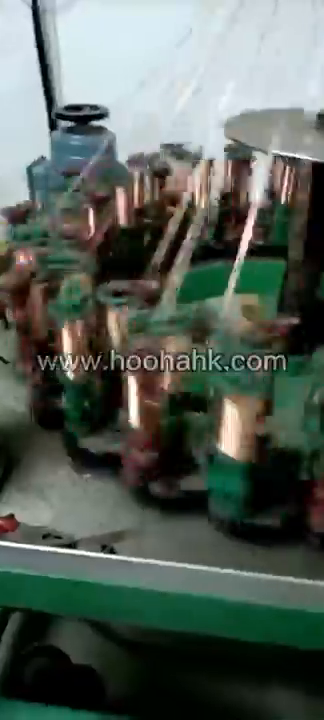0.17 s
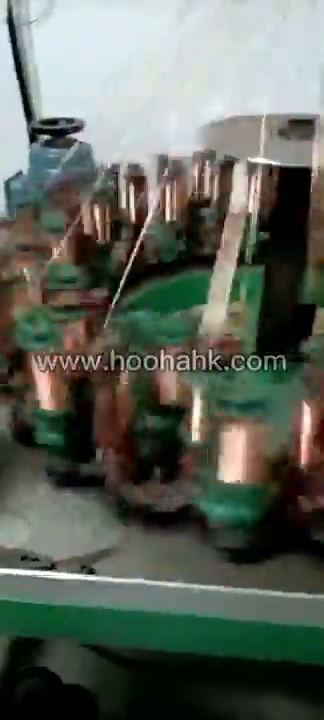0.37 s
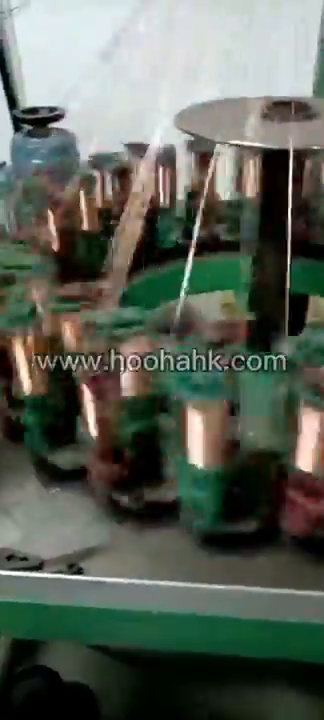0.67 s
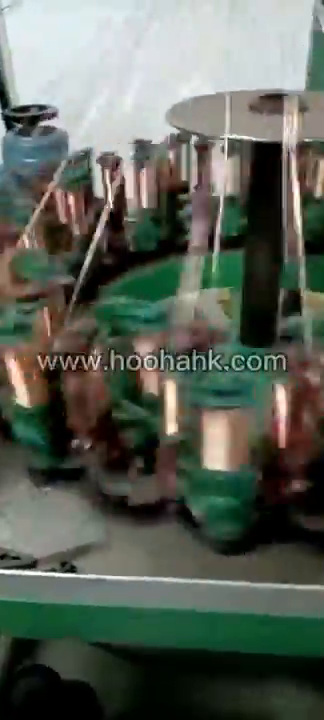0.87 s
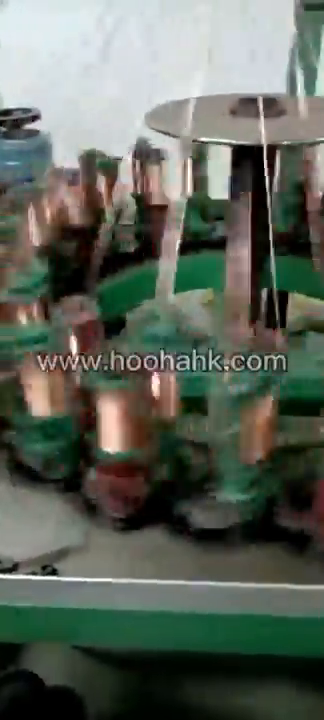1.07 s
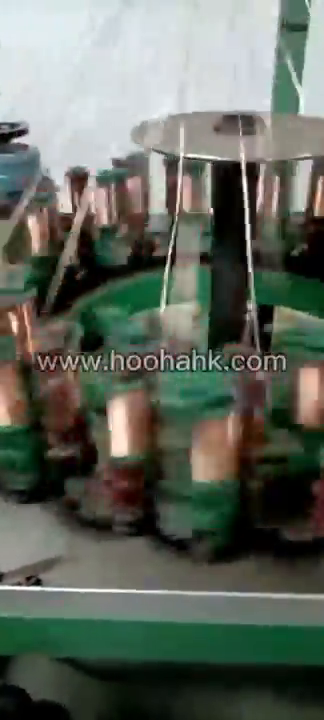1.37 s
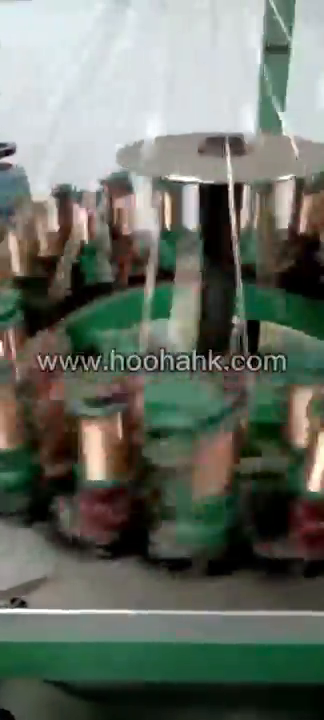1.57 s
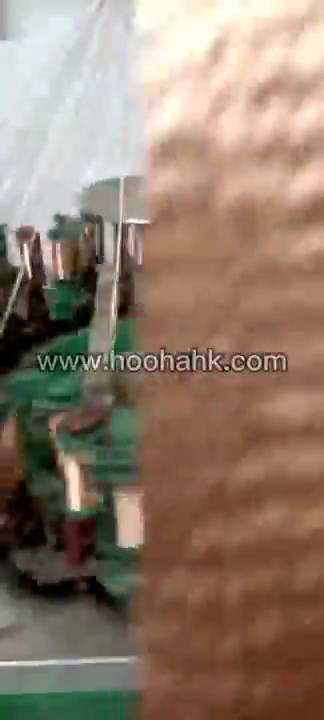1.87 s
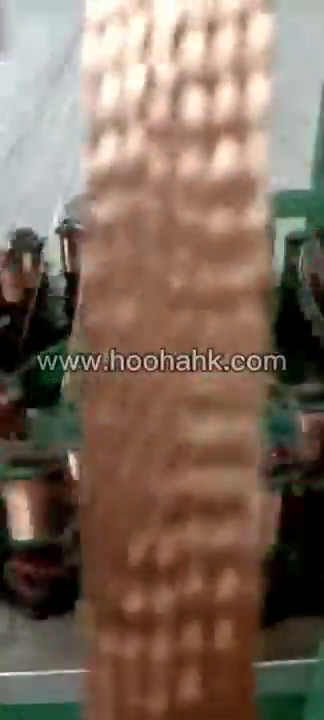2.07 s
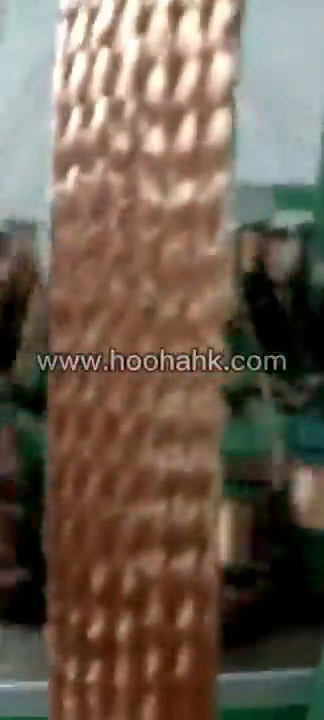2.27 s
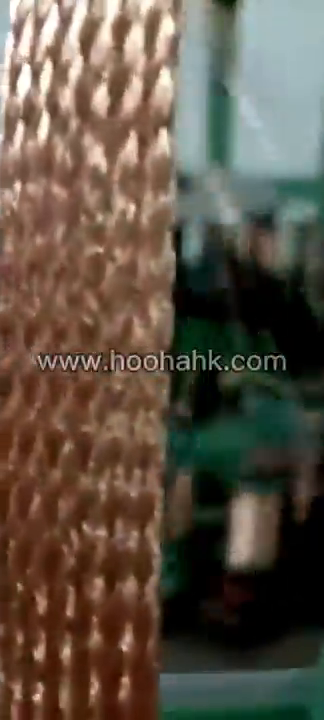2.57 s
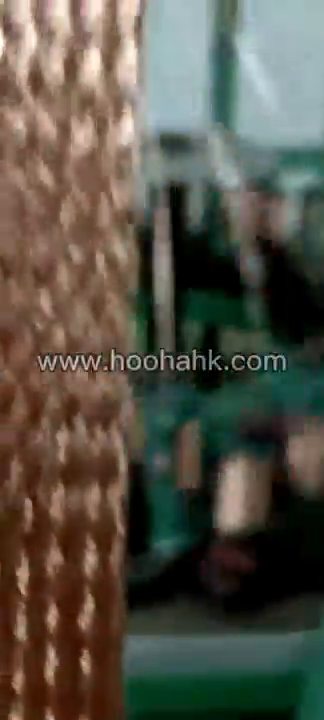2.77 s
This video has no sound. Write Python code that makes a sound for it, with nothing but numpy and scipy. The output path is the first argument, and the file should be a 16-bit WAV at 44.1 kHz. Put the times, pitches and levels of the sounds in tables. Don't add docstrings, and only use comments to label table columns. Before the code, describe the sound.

Dense metallic rattle of a wire braiding machine running close by in a factory hall

```python
import sys
import numpy as np
from scipy import signal
from scipy.fft import rfft, irfft
from scipy.io import wavfile
from scipy.ndimage import uniform_filter1d

SR = 44100
rng = np.random.default_rng(int(sys.argv[2]) if len(sys.argv) > 2 else 0)


def rack_gain(trim_db):
    fader = np.asarray(trim_db, float)
    return 10 ** (fader / 20)


def bounce(signal):
    frames = np.transpose(np.atleast_2d(signal))
    limited = np.clip(frames, -1, 1)
    pcm = np.round(limited * 32767).astype(np.int16)
    wavfile.write(sys.argv[1], SR, pcm)


N = 128772
TIME = np.arange(N) / SR

# time_s, level_db
CLOSENESS = [(.1, -31), (.3, -26), (.55, -27), (.75, -26), (.96, -27), (1.0, -33), (1.25, -32.5),
             (1.5, -33.5), (1.9, -32.5), (2.3, -33), (2.6, -32.5), (2.8, -33.5), (2.92, -35)]
# freq_hz, density_db_per_hz
WASH_SPECTRUM = [(150, -10.5), (250, -6.5), (480, -10.5), (560, -1.5), (1270, -6), (2560, -3.5),
                 (9120, -13), (10600, -10.5), (12400, -33)]
# freq_hz, density_db_per_hz
RATTLE_SPECTRUM = [(290, 12), (500, -1.5), (1700, -0.5), (2430, 4), (6680, -1.5), (10100, -8), (12400, -11)]
# ring_hz, width_hz, level_db
PLATES = [(764, 16, -18.5), (819.5, 8.3, -17), (600, 15, -43), (447.7, 9.7, -24.5), (1652, 304, -9),
          (2440, 270, -16), (4525, 19, -19.5), (6200, 360, -19), (6680, 460, -19.5)]
# freq_hz, density_db_per_hz
RUMBLE_SPECTRUM = [(8.8, -36), (15, -8), (43, -8), (87, -3), (113, -4.5), (188, 1.5), (296, -10),
                   (400, -7.5), (520, -26), (880, -120)]
# freq_hz, density_db_per_hz
FLOOR_SPECTRUM = [(20, -13), (30, -10.5), (42, 6.5), (60, -8), (115, -6), (150, -13), (220, -30)]
GEAR_HZ = [538.5, 538.5, 1361.4, 121.5]
# level_db, peak_s, swell_width_s, swell_db
GEAR_SWELLS = [
    (-63, 0.42, 0.56, 19),
    (-49.5, 2.69, 0.21, 4.5),
    (-54, 0.79, 0.37, 17),
    (-46.5, 2, 0.31, 3.5),
]
DRIVE_HZ = [8855, 8904, 8954, 9051, 8640]
DRIVE_DB = [-55.5, -54, -57.5, -57.5, -64]
# time_s, level_db, length_s, brightness_db
HANDOVERS = [(.135, 3, 0.09, -3.5), (0.262, -5, 0.032, 5.5), (0.397, -2, 0.063, 3.5),
             (0.533, 2.5, 0.059, 0.5), (0.64, -3.5, 0.15, 4), (0.796, -1.5, 0.097, -1),
             (0.914, -2, 0.033, 3), (1.023, -5.5, 0.074, 8.5), (1.178, 2.5, 0.039, -1),
             (1.312, 0, 0.038, -4.5), (1.397, -1, 0.07, 0), (1.561, -1.5, 0.028, 2),
             (1.666, -1.5, 0.055, 3.5), (1.79, -16, 0.1, 13.5), (1.919, -3.5, 0.042, 0),
             (2.05, -14, 0.064, 10), (2.192, -1.5, 0.11, -6), (2.324, -10, 0.027, 6),
             (2.443, -0.5, 0.094, -3.5), (2.574, -9.5, 0.061, 8), (2.683, 0.5, 0.038, 1.5),
             (2.809, -8, 0.06, 9), (2.85, -2, 0.046, -12)]
# time_s, level_db, pitch_hz
BOOMS = [(.2, -33.5, 744), (0.328, -28, 785), (.46, -45, 790), (.82, -32, 738), (.94, -32, 786),
         (1.07, -37, 794), (1.344, -31, 787), (1.9, -40.5, 780), (2.345, -53, 780), (.84, -32, 890),
         (0.979, -32.5, 770), (1.02, -40, 777), (.26, -35, 548), (.2, -32, 192), (.36, -30, 175),
         (.45, -29.5, 125), (.54, -32, 185), (1.18, -34, 180), (1.76, -34.5, 139), (2.06, -35, 192)]
# time_s, peak_db, ring_hz
KNOCKS = [(.366, -19, 6600), (0.652, -11, 2380), (0.673, -7, 3470), (0.889, -10, 2440), (0.929, -12, 5300),
          (1.01, -8.5, 6600), (1.064, -19, 6400), (1.144, -15, 6230), (1.181, -16, 6040),
          (1.311, -9.5, 3070), (1.357, -6, 6600), (1.401, -13, 6960), (1.423, -15.5, 5940),
          (1.549, -8.5, 6730), (1.676, -15, 3880), (1.775, -11.5, 6050), (2.036, -18, 3350),
          (2.188, -15.5, 4770), (2.678, -11, 2550), (2.803, -10.5, 6630), (.379, -14, 2940),
          (0.512, -14, 2700), (0.859, -14, 2930), (0.913, -10, 2430), (1.282, -13, 2530),
          (1.571, -19, 2540), (1.66, -22, 3280), (2.111, -21, 5150), (2.166, -15, 1790), (2.205, -19, 4730),
          (2.239, -18, 1680), (2.336, -17, 2450), (2.42, -18, 2000), (2.457, -18, 3200), (2.494, -29, 1650),
          (2.697, -27, 6650), (2.787, -23, 7400), (1.347, -26, 2740), (1.375, -27, 3630),
          (1.408, -21, 3800), (2.192, -22, 2870), (2.215, -20, 3640), (0.276, -15, 2980), (.76, -21, 3450),
          (.69, -23, 3000), (2.685, -19, 8800)]
# ring_hz, level_db
WEIGHT_RINGS = [(2800, -6), (4700, -6), (5800, -5), (7400, -5), (8500, -9), (9900, -9)]
# start_s, low_hz, high_hz, level_db
SPLITS = [
    (.466, 6100, 7800, -37),
    (.466, 11200, 12000, -80),
    (2.3, 4600, 5900, -41),
    (2.718, 5000, 7000, -41),
    (2.718, 9500, 10500, -52),
]
# start_s, length_s, level_db, start_hz, end_hz
SQUEAKS = [(.497, .02, -34, 6850, 6750), (.517, .022, -34, 6500, 6750), (.538, .016, -33, 6700, 6900),
           (.554, .052, -29, 7830, 7700), (.604, .03, -39, 7600, 7100), (.66, .03, -38, 7300, 7550),
           (.587, .009, -33, 10600, 10600), (1.0, .014, -35, 6750, 6850), (1.04, .035, -41, 7000, 6800),
           (1.078, .038, -34, 7740, 7880), (1.108, .03, -36, 7750, 7450), (1.36, .04, -43, 5950, 5850),
           (1.388, .022, -37, 5750, 5850), (1.3, .2, -50, 9790, 9770), (1.6, .06, -40, 7800, 7650),
           (2.082, .045, -40, 7680, 7850), (2.03, .03, -43, 6750, 6850), (2.042, .018, -38, 3250, 3300),
           (2.06, .03, -43, 3000, 2950), (2.3, .03, -42, 3950, 3900), (2.335, .05, -41, 720, 1050),
           (2.385, .014, -39, 1400, 1500), (2.405, .03, -43, 4550, 4600), (2.49, .05, -41, 1620, 1750),
           (2.125, .045, -43, 7750, 7350), (2.168, .035, -41, 7400, 7850), (2.525, .025, -40, 7300, 7150),
           (2.548, .022, -40, 6650, 6550), (2.57, .032, -31, 6540, 6540), (2.6, .035, -43, 6500, 6700),
           (2.628, .036, -34, 7680, 7780), (2.675, .025, -38, 7200, 7100), (2.68, .045, -40, 2520, 2560),
           (2.708, .016, -38, 7150, 7150)]


def evened(x):
    return x / np.sqrt(np.mean(x ** 2) + 1e-20)


def read(points, hz):
    point_hz, point_db = np.transpose(points)
    return np.interp(np.log(hz + 1), np.log(point_hz + 1), point_db, left=-90, right=-90)


def colour(x, points):
    gain = rack_gain(read(points, np.fft.rfftfreq(N, 1 / SR)))
    return irfft(rfft(x) * gain, N)


def drift(top_hz):
    z = rfft(rng.standard_normal(N))
    lowpass = np.exp(-(np.fft.rfftfreq(N, 1 / SR) / top_hz) ** 2)
    return evened(irfft(z * lowpass, N))


def resonate(x, hz, width_hz):
    turn = np.exp(2j * np.pi * hz * TIME)
    r = np.exp(-np.pi * width_hz / SR)
    return 2 * (turn * signal.lfilter([1 - r], [1, -r], x / turn)).real


def add(mix, start_s, sound):
    part = mix[round(start_s * SR):][:len(sound)]
    part += sound[:len(part)]


def patchy(points, patchy_db, flicker_db):
    frames = N // 128 + 6
    real, imag, patches = rng.standard_normal((frames, 257, 3)).T
    patches = uniform_filter1d(patches, size=6, axis=0)
    patches = evened(uniform_filter1d(patches, size=14, axis=1))
    z = (real + 1j * imag) * rack_gain(patchy_db * patches)
    white = signal.istft(z, nperseg=512, noverlap=384)[1][:N]
    return evened(colour(white, points)) * rack_gain(flicker_db * drift(13.4))


def rattle(taps_per_s):
    spread_db, ring_cycles = 1, 11
    size = rack_gain(spread_db * np.minimum(rng.exponential(1, N), 5)) * (rng.random(N) < taps_per_s / SR)
    kind = rng.integers(0, 32, N)
    out, t = np.zeros(N), np.arange(1024) / SR
    for k, hz in enumerate(np.geomspace(600, 11500, num=32)):
        tap = np.sin(2 * np.pi * hz * t) * np.exp(-2 * t * hz / ring_cycles)
        tap *= np.sqrt(hz) / np.linalg.norm(tap)
        out += signal.oaconvolve(size * (kind == k), tap)[:N]
    return evened(colour(out, RATTLE_SPECTRUM))


def plates():
    shaking = rng.standard_normal(N) * rack_gain(2 * drift(30))
    out = np.zeros(N)
    for hz, width_hz, db in PLATES:
        ring = resonate(resonate(shaking, hz, width_hz), hz, 2 * width_hz)
        out += rack_gain(db) * evened(ring)
    return out


def steady_clatter():
    rattle_db, clatter_db, clatter_hz = -8, 1, 120
    wash = patchy(WASH_SPECTRUM, patchy_db=1.5, flicker_db=-1.44)
    steady = wash + rack_gain(rattle_db) * rattle(2500) + plates()
    return steady * evened(rack_gain(clatter_db * drift(clatter_hz)))


def frame_rumble():
    return rack_gain(-36.5) * patchy(RUMBLE_SPECTRUM, patchy_db=0.95, flicker_db=0.5)


def floor_shake():
    return rack_gain(-42) * patchy(FLOOR_SPECTRUM, patchy_db=-1.5, flicker_db=2.5)


def gear_whines():
    waver_db, out = 2.5, np.zeros(N)
    for hz, (db, peak_s, width_s, swell_db) in zip(GEAR_HZ, GEAR_SWELLS):
        swell = swell_db * np.exp(-((TIME - peak_s) / width_s) ** 2)
        level_db = db + 1.5 + swell + waver_db * drift(14.0)
        out += rack_gain(level_db) * np.sin(2 * np.pi * hz * TIME + 1.1 * drift(7.1))
    return out


def drive_whine():
    fade_s, fade_db, swell_s, swell_db = 1.52, -10, 1.38, 2.5
    fade = fade_db / (1 + np.exp((fade_s - TIME) / .04))
    swell = swell_db * np.exp(-((TIME - swell_s) / .2) ** 2)
    out = np.zeros(N)
    for hz, db in zip(DRIVE_HZ, DRIVE_DB):
        level_db = db + 5 + fade + swell + 1.5 * drift(5)
        out += rack_gain(level_db) * np.sin(2 * np.pi * hz * TIME + .9 * drift(4))
    return out


def handovers():
    bright_from_hz = 2700
    low, high = np.zeros(N), np.zeros(N)
    for s, db, length_s, bright_db in HANDOVERS:
        u = (TIME - s) / max(length_s, .01)
        power = rack_gain(2 * db) * np.exp(-np.where(u < 0, 2.9 * u, 1.61 * u) ** 2)
        low += power
        high += power * rack_gain(2 * bright_db)
    taps = rattle(9000)
    dull = signal.filtfilt(*signal.butter(1, bright_from_hz, fs=SR), taps)
    return rack_gain(-27.5) * (np.sqrt(low) * dull + np.sqrt(high) * (taps - dull))


def booms():
    boom_s, width_hz = 0.016, 76
    hiss, out = rng.standard_normal(N), np.zeros(N)
    for s, db, hz in BOOMS:
        hum = evened(resonate(resonate(hiss, hz, width_hz), hz, width_hz))
        out += rack_gain(db) * hum * np.exp(-((TIME - s - boom_s) / boom_s) ** 2)
    return out


def knocks():
    ring_db, ring_t60_s, rise_s = -6, .017, .0015
    splash_db, splash_t60_s = -20.5, 0.13
    tick_db, tick_t60_s = -11, .008
    apart_db_per_octave = -5
    out, t = np.zeros(N), np.arange(2600) / SR
    side_hz, side_db = np.transpose(WEIGHT_RINGS)[:, :, None]
    for s, db, hz in KNOCKS:
        hiss = rng.standard_normal(2600)
        level_db = side_db + apart_db_per_octave * abs(np.log2(side_hz / hz)) + 2 * hiss[:6, None]
        pitch_hz = side_hz * (1 + 0.029 * hiss[6:12, None])
        sides = (rack_gain(level_db) * np.sin(2 * np.pi * pitch_hz * t)).sum(axis=0)
        ring = (np.sin(2 * np.pi * hz * t) + sides) * rack_gain(ring_db - 60 * t / ring_t60_s)
        splash = evened(signal.lfilter([1, -1, -1, 1], [1, -.9, .5], hiss))
        splash *= rack_gain(splash_db - 60 * t / splash_t60_s) / 2
        add(out, s - .001, rack_gain(db) * np.minimum(t / rise_s, 1) * (ring + splash))
        add(out, s, rack_gain(db + tick_db - 60 * t / tick_t60_s) * np.diff(hiss, prepend=0))
    return out


def splits():
    out, hz = np.zeros(N), np.fft.rfftfreq(2048, 1 / SR)
    for s, low_hz, high_hz, db in SPLITS:
        band = irfft(rfft(rng.standard_normal(2048)) * (hz > low_hz) * (hz < high_hz))
        add(out, s, rack_gain(db) * evened(band) * np.hanning(2048))
    return np.array([out, -out])


def squeaks():
    wobble_ratio, flutter_db, scratch, scratch_hz = .004, 1.8, .3, 450
    squeak_db, lean, roundness = 4, 1.2, .6
    out, wobble = np.zeros(N), drift(87)
    flutter = rack_gain(flutter_db * drift(100)) * (1 + scratch * drift(scratch_hz))
    for s, length_s, db, from_hz, to_hz in SQUEAKS:
        u = np.clip((TIME - s) / length_s, 0, 1)
        hz = (from_hz + (to_hz - from_hz) * u) * (1 + wobble_ratio * wobble)
        shape = abs(np.sin(np.pi * u ** lean)) ** roundness
        out += shape * rack_gain(db + squeak_db) * flutter * np.sin(2 * np.pi * np.cumsum(hz) / SR)
    return out


def scene():
    rumble_follow, handover_follow = 0.6, 0.52
    level_db = np.interp(TIME, *np.transpose(CLOSENESS))
    near_db = level_db + 30
    mix = rack_gain(level_db) * steady_clatter()
    mix += rack_gain(rumble_follow * near_db) * frame_rumble() + floor_shake()
    mix += gear_whines() + drive_whine()
    mix += rack_gain(handover_follow * near_db) * handovers()
    mix += booms() + knocks() + squeaks()
    return np.array([mix, mix])


def ragged_top(x):
    top_hz, edge_hz, fall_hz, wander_hz, line_hz, hole_hz = 10330, 12050, 165, 200, 65, 130
    hole_chance, spark_chance, lift_db_per_khz = .06, .018, 6
    full_until_s = .2
    hz, t, z = signal.stft(x, SR, nperseg=2048, noverlap=1024)
    column_hz = hz[:, None]
    above_hz = column_hz - top_hz - wander_hz * rng.standard_normal(len(t))
    chance = spark_chance + 1 / (1 + np.exp(np.clip(above_hz / fall_hz, -30, 30)))
    chance = (chance + (t < full_until_s)) * (column_hz < edge_hz)
    keep = rng.random((len(t), 400)).T[(hz // line_hz).astype(int)] < chance
    hole_luck = rng.random((len(t), 200)).T[(hz // hole_hz).astype(int)]
    holes = hole_luck < hole_chance * np.clip(column_hz / 7000 - 1, 0, 1)
    above_khz = np.clip(column_hz - top_hz, 0, 2000) / 1000
    lift = rack_gain(lift_db_per_khz * above_khz * (t >= full_until_s))
    return signal.istft(z * keep * lift * ~holes, SR, nperseg=2048, noverlap=1024)[1][:, :N]


def top_cut(x):
    return signal.sosfilt(signal.butter(12, 12370, fs=SR, output="sos"), x)


def record(dry):
    start_s, open_s = .1052, .001
    opening = np.clip((TIME - start_s) / open_s, 0, 1)
    mix = (ragged_top(dry) + splits()) * opening
    return top_cut(mix)


dry = scene()
out = record(dry)
bounce(out)
```